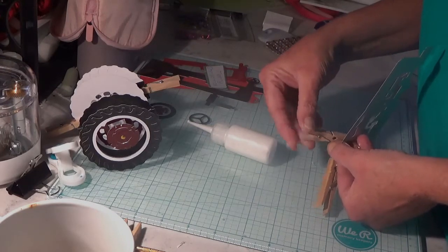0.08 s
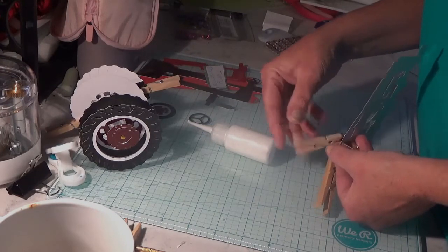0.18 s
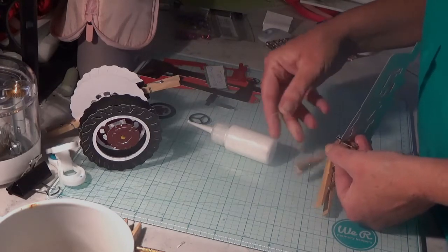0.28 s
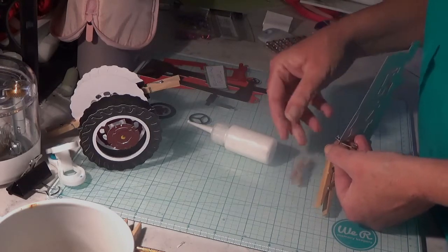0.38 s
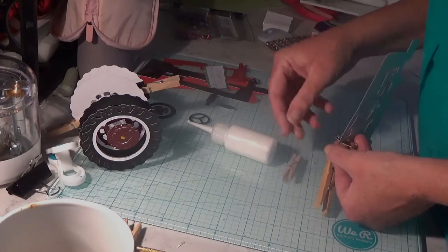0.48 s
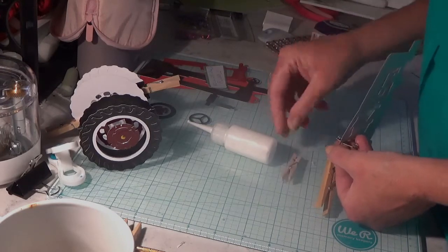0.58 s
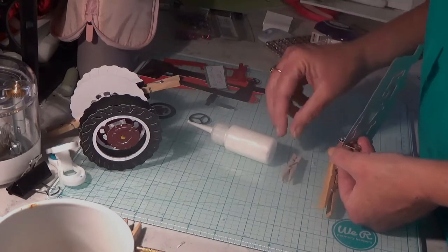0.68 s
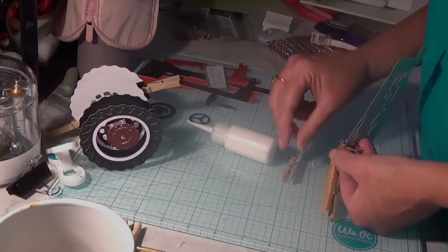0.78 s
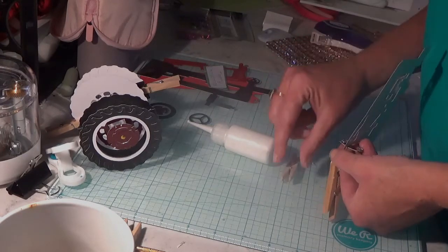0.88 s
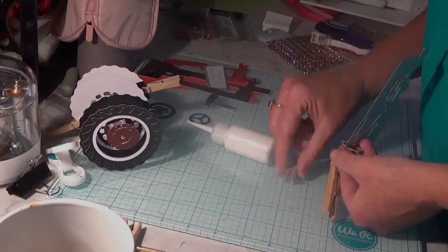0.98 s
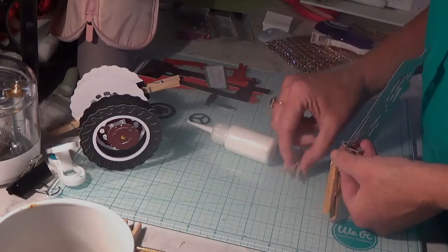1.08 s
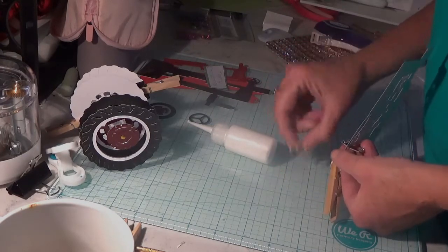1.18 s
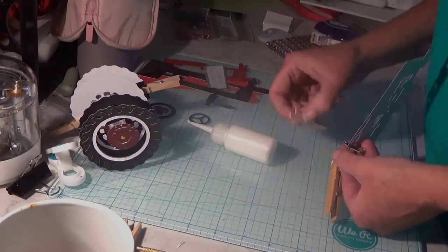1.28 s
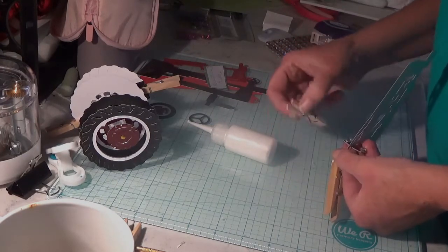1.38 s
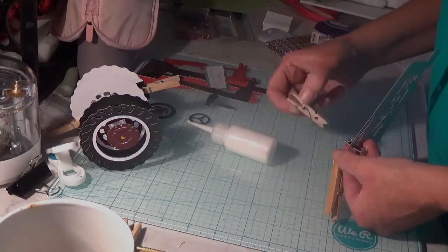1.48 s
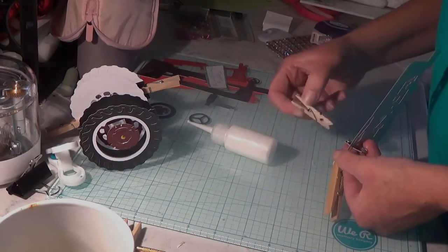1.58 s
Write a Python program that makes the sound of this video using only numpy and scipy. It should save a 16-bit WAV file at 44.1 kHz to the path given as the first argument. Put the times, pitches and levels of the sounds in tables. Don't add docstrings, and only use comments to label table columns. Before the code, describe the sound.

A wooden spring clothespin falls on a cutting mat: a loud, dry clack at 0.23 s, hard bounces and springy metallic clicks from 0.30 to 0.40, then a faint rocking and gritty skid from 0.48 to 0.63. Very light taps come near 0.9 to 1.0, and a modest grip click at 1.48. Short small-room echo, close microphone; steady quiet fan rush, low hum and faint rapid ticking throughout.

```python
import sys
import numpy as np
from scipy import signal
from scipy.fft import rfft, irfft, next_fast_len
from scipy.io import wavfile
from scipy.ndimage import uniform_filter1d

SR = 44100
rng = np.random.default_rng(int(sys.argv[2]) if len(sys.argv) > 2 else 0)


def store_pcm(level_fs):
    pcm = np.round(np.clip(level_fs, -1, 1) * 32767).astype(np.int16)
    wavfile.write(sys.argv[1], SR, np.atleast_2d(pcm).T)


def magnitude_from_level(level_db):
    exponent = np.asarray(level_db, float) / 20
    return 10 ** exponent


N = 70560

BROAD_FILL_DB = [-11, -15.5, -14, -14, -14, -11]


def unit(x):
    return x / np.sqrt(np.mean(x ** 2) + 1e-20)


def along(points, hz):
    f, v = np.transpose(points)
    return np.interp(np.log(hz + 1), np.log(f + 1), v)


def filtered(x, response):
    size = next_fast_len(N + SR // 2)
    hz = np.fft.rfftfreq(size, 1 / SR)
    return irfft(rfft(x, size) * response(hz), size)[..., :N]


def peak(f, hz, width_hz):
    damping = 1j * f * width_hz
    return damping / (hz * hz - f * f + damping)


def pin():
    # start_s, level_db, chatter_t60_s (time to fall 60 dB)
    flat_hits = [
        (.2348, -0.5, 0.048),
        (.2435, -15.5, 0.08),
        (.2645, -44, 0.016),
        (.4877, -22.5, 0.089),
        (.5015, -25, 0.021),
        (.5112, -21.5, 0.01),
    ]
    end_hits = [
        (.3028, 2, 0.051),
        (.3262, -3.5, 0.028),
        (.3672, -4.5, 0.034),
        (.3945, -13, 0.012),
        (.4025, -17, 0.03),
        (.496, -27, 0.0093),
    ]
    coil_hits = [
        (.3138, -2, 0.035),
        (.3405, -22, 0.026),
        (.378, -14.5, .05),
        (1.403, -37, 0.012),
    ]
    grip_hits = [
        (1.4795, -15.5, 0.059),
        (1.490, -30, 0.032),
    ]
    tap_hits = [
        (.9065, -31.5, 0.085),
        (.9875, -30, 0.087),
        (.9925, -26.5, .05),
        (.998, -35.5, 0.065),
    ]
    # pitch_hz, width_hz, level_db
    flat_peaks = [(497, 70, -3), (850, 150, 2.5), (1195, 176, 0), (1460, 160, 1.5), (2014, 183, 8.5),
                  (2994, 116, 2.5), (3920, 740, -10), (4970, 150, -24), (5250, 350, -2.5), (6430, 180, 4.5),
                  (7700, 180, -3), (9050, 190, -8), (10700, 280, -45)]
    end_peaks = [(490, 210, -23.5), (742, 73, -11.5), (1110, 170, -26), (2024, 160, -0.5),
                 (3055, 164, -3.5), (4084, 150, 2.5), (5120, 387, -14), (6160, 690, -9.5), (7790, 160, -11),
                 (9100, 230, -27), (9700, 190, -33)]
    coil_peaks = [(1075, 210, -6.5), (2120, 180, -16), (3270, 540, -10.5), (4340, 140, 0), (5500, 370, -15),
                  (6870, 630, -3.5), (7530, 270, -7), (8870, 250, 3.5), (9660, 600, -11),
                  (10700, 170, -0.5)]
    grip_peaks = [(1270, 780, -4), (2160, 230, 8.5), (3280, 400, -7), (4190, 335, 7.5), (5720, 820, 1),
                  (6970, 220, 4), (7850, 230, -10), (10700, 650, -26)]
    tap_peaks = [(504, 220, -1.5), (810, 200, -0.5), (1100, 310, 0.5), (1944, 290, 6), (3000, 300, -4),
                 (4170, 220, -1), (6000, 260, -12), (11000, 350, -8.5)]
    kinds = [(flat_hits, flat_peaks), (end_hits, end_peaks), (coil_hits, coil_peaks),
             (grip_hits, grip_peaks), (tap_hits, tap_peaks)]
    parts = [body(blows(hits), peaks, fill_db) for (hits, peaks), fill_db in zip(kinds, BROAD_FILL_DB)]
    parts += [slide(), coil()]
    return sum(part + room(part) for part in parts)


def blows(hits):
    blow_db, chatter_db, grit_db = 15, -8, 1.5
    rise_s, pan_db = 0.00084, 1.45
    sides = magnitude_from_level([[pan_db / 2], [-pan_db / 2]])
    track = np.zeros((2, N))
    t = np.arange(SR // 8) / SR
    for start_s, level_db, t60_s in hits:
        rough = magnitude_from_level(grit_db * unit(uniform_filter1d(rng.standard_normal(len(t)), 40)))
        fade = (1 - np.exp(-t / rise_s)) * magnitude_from_level(chatter_db - 60 * t / t60_s)
        force = fade * rough * rng.standard_normal(len(t))
        force[8] += magnitude_from_level(blow_db)
        part = track[:, round(start_s * SR):][:, :len(t)]
        part += magnitude_from_level(level_db) * sides * force[:part.shape[1]]
    return track


def body(force, peaks, fill_db):
    narrowest_hz, widen = 220, 1.55

    def response(f):
        total = 0
        for k, (hz, width_hz, level_db) in enumerate(peaks):
            width_hz = widen * max(width_hz, narrowest_hz)
            total = total + (-1) ** k * magnitude_from_level(level_db) * peak(f, hz, width_hz) ** 2
        total = total + magnitude_from_level(fill_db) * peak(f, 2360, 7200)
        return total / np.sqrt(np.mean(np.abs(total[f < 11000]) ** 2))
    return filtered(force, response)


def slide():
    # time_s, level_db
    rubbing = [
        (0.484, -50),
        (0.492, -28.5),
        (0.57, -35),
        (0.632, -60),
        (0.64, -90),
    ]
    # pitch_hz, width_hz, level_db
    rub_peaks = [(472, 170, 0), (800, 160, 5), (1170, 162, 0), (1560, 110, 5), (2140, 170, -2),
                 (3100, 230, -24), (3880, 230, -19), (4660, 115, -2), (6000, 190, -15), (7150, 210, -3),
                 (8460, 200, -2), (11100, 780, -11.5)]
    rub_db, grit_db = -2.5, 3.5
    s, db = np.transpose(rubbing)
    t = np.arange(N) / SR
    grit = magnitude_from_level(grit_db * unit(uniform_filter1d(rng.standard_normal(N), 90)))
    force = unit(grit * rng.standard_normal(N)) * magnitude_from_level(np.interp(t, s, db) + rub_db)
    force = force * (t > s[0]) * (t < s[-1])
    return body(np.array([force, force]), rub_peaks, BROAD_FILL_DB[-1])


def coil():
    # start_s, pitch_hz, level_db, t60_s
    rings = [
        (0.24, 6880, -7, 0.02),
        (0.32, 8490, -20, 0.14),
        (0.42, 6880, -29, 0.021),
        (.3775, 6900, -12.5, 0.025),
        (1.4914, 7600, -28, 0.027),
        (0.234, 3084, -12.5, 0.04),
        (.535, 7600, -44, 0.31),
        (.33, 760, -32.5, 0.57),
    ]
    rise_s, wander = 0.002, 0.04
    track = np.zeros(N)
    t = np.arange(SR // 8) / SR
    for start_s, hz, level_db, t60_s in rings:
        drift = wander * np.cumsum(rng.standard_normal(len(t)))
        fade = magnitude_from_level(level_db - 60 * t / t60_s) * (1 - np.exp(-t / rise_s))
        part = track[round(start_s * SR):][:len(t)]
        part += (fade * np.sin(2 * np.pi * hz * t + drift))[:len(part)]
    return np.array([track, track])


def room(x):
    # pitch_hz, t60_s
    tail_times = [(200, 1), (800, 0.65), (2000, 0.46), (5000, 0.18), (11000, 0.41)]
    # delay_s, level_db
    walls = [(.0035, -29), (.0095, -11), (.014, -19), (.021, -28), (.029, -17.5)]
    tail_db, build_up_s, alike = -9, 0.0049, 0.84
    hz, t, grid = signal.stft(rng.standard_normal((2, SR // 2)), SR, nperseg=256)
    fade = magnitude_from_level(-60 * t / along(tail_times, hz)[:, None])
    a, b = signal.istft(grid * fade, SR, nperseg=256)[1]
    turn = np.arccos(alike) / 2
    middle, side = np.cos(turn) * a, np.sin(turn) * b
    tail = np.array([middle + side, middle - side])
    tail = tail * (1 - np.exp(-np.arange(len(a)) / SR / build_up_s))
    tail = magnitude_from_level(tail_db) * tail / np.linalg.norm(tail[0])
    skews = rng.integers(-6, 7, len(walls))
    for (delay_s, level_db), skew in zip(walls, skews):
        at = round(delay_s * SR)
        tail[[0, 1], [at + skew, at - skew]] += magnitude_from_level(level_db)
    return signal.fftconvolve(x.mean(0)[None], tail, axes=1)[:, :N]


def fan():
    return fan_air() + fan_hum() + fan_tick()


def fan_air():
    # pitch_hz, level_db (per Hz)
    air_color = [(12, -23), (20, -38), (128, -2), (229, -4), (370, -10), (645, -9.5), (3000, -17.5),
                 (8900, -23), (11300, -26.5), (14700, -64), (22000, -120)]
    # pitch_hz, likeness (1 = same)
    likeness = [(60, 0.98), (220, 0.87), (810, 0.043), (3000, 0.13), (11100, 0.89)]

    def spread(hz):
        turn = np.arccos(np.clip(along(likeness, hz), -1, 1)) / 2
        return np.array([np.cos(turn), np.sin(turn)])
    middle, side = filtered(rng.standard_normal((2, N)), spread)
    noise = np.array([middle + side, middle - side])
    air = filtered(noise, lambda hz: magnitude_from_level(along(air_color, hz)))
    air = air / np.std(filtered(air, lambda hz: hz > 200))
    return magnitude_from_level(-51) * air


def fan_hum():
    # pitch_hz, width_hz, level_db (rms)
    hum_bands = [(56.6, 14, -54.5), (125.1, 9.2, -53), (166.9, 4.8, -72), (376.5, 59, -63.5),
                 (1377, 75, -66)]
    hum = 0
    for hz, width_hz, level_db in hum_bands:
        band = unit(filtered(rng.standard_normal(N), lambda f: peak(f, hz, width_hz) ** 2))
        loudness = np.abs(signal.hilbert(band))
        hum = hum + magnitude_from_level(level_db) * unit(band / (1.2 + loudness))
    return hum


def fan_tick():
    # pitch_hz, width_hz, level_db
    tick_bands = [(2660, 300, -7), (3020, 430, 2)]
    first_s, ticks_per_s = 0.0245, 29.97
    tick_db, weak_db, uneven_db, t60_s = -47, -5, 2.3, 0.064
    turns = (np.arange(N) / SR - first_s) * ticks_per_s
    count = np.floor(turns).astype(int)
    size_db = uneven_db * rng.standard_normal(64)[count + 2] + weak_db * (count % 2)

    def color(f):
        return sum(magnitude_from_level(level_db) * peak(f, hz, width_hz) for hz, width_hz, level_db in tick_bands)
    buzz = unit(filtered(rng.standard_normal(N), color))
    since_s = turns % 1 / ticks_per_s
    return magnitude_from_level(tick_db + size_db - 60 * since_s / t60_s) * (1 - np.exp(-since_s / 0.004)) * buzz


def scene():
    return fan() + pin()


def low_pass(x):
    return signal.sosfilt(signal.butter(12, 11660, fs=SR, output="sos"), x)


def record(dry):
    # start_s, end_s
    dull_times = [
        (.229, .2325),
        (.2935, .2995),
        (1.468, 1.474),
    ]
    top_hz, top_width_hz = 11200, 160
    dull_above_hz, dull_db = 2380, -35
    x = dry / (1 + np.abs(dry / 0.86) ** 8) ** (1 / 8)
    x = filtered(x, lambda hz: 1 / (1 + np.exp(np.clip((hz - top_hz) / top_width_hz * 2, -40, 40))))
    t = np.arange(N) / SR
    dull = sum(np.where((t > start) & (t < end), 1.0, 0.0) for start, end in dull_times)
    dull = uniform_filter1d(dull, size=40)
    treble = filtered(x, lambda hz: 1 / (1 + (dull_above_hz / (hz + 1)) ** 8))
    return low_pass(x - dull * (1 - magnitude_from_level(dull_db)) * treble)


dry = scene()
out = record(dry)
store_pcm(out)
```